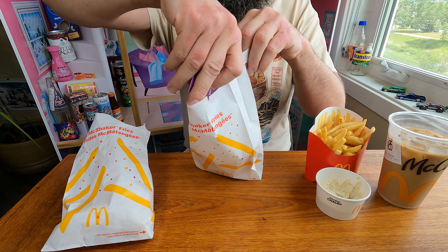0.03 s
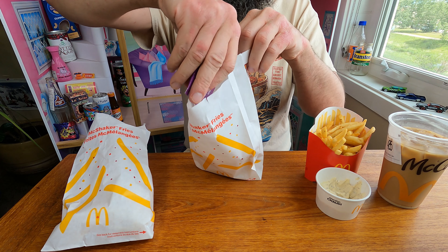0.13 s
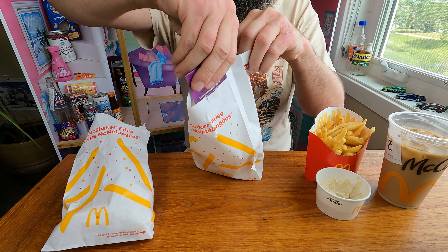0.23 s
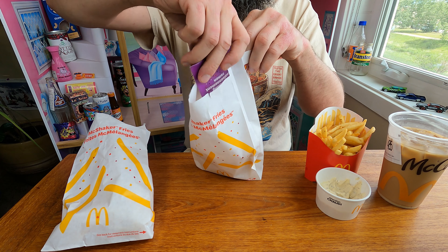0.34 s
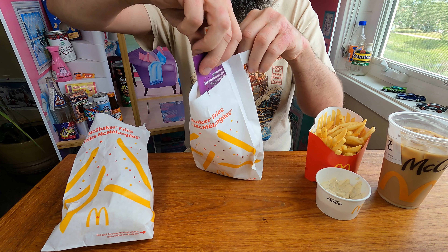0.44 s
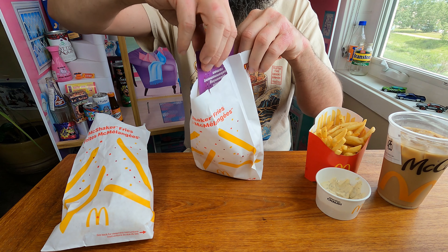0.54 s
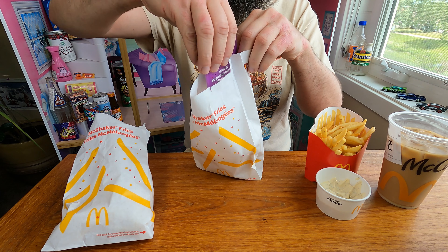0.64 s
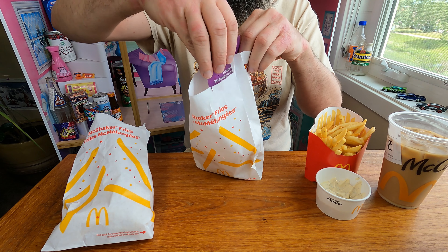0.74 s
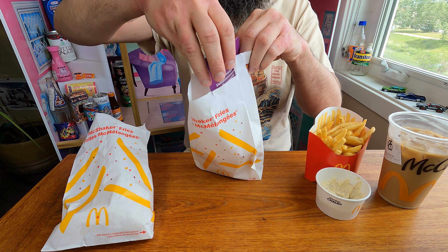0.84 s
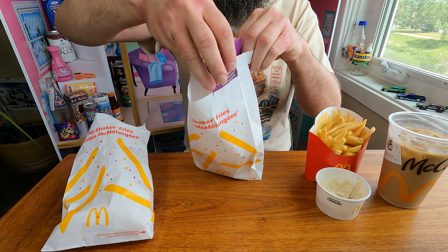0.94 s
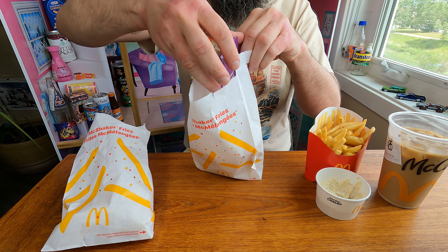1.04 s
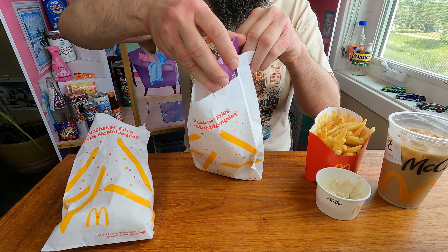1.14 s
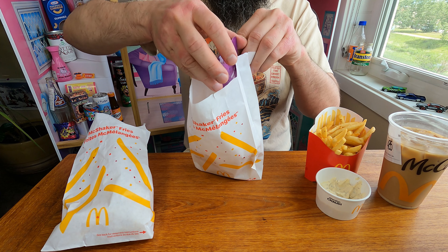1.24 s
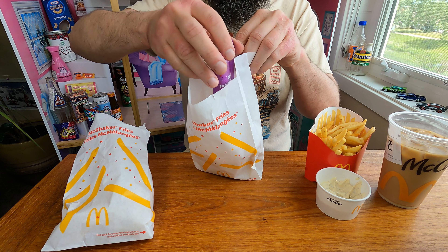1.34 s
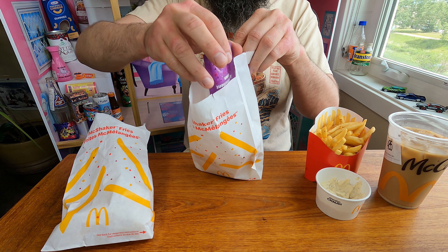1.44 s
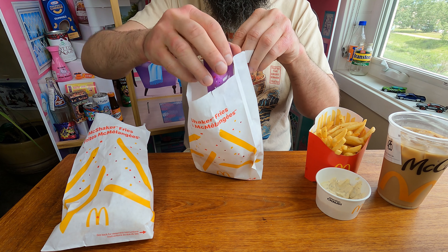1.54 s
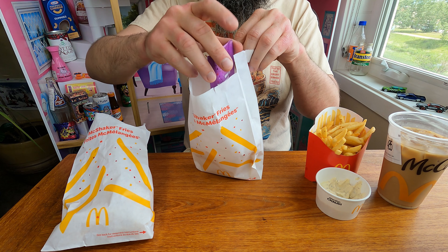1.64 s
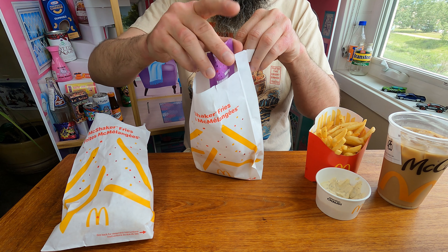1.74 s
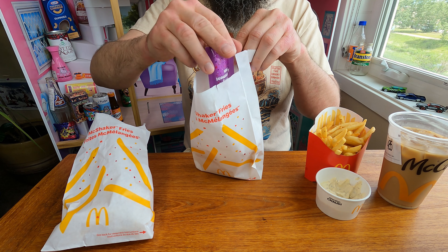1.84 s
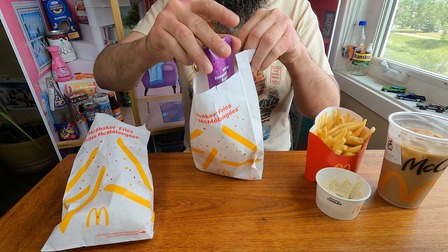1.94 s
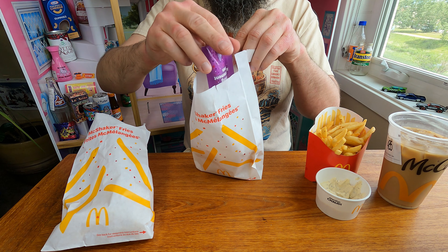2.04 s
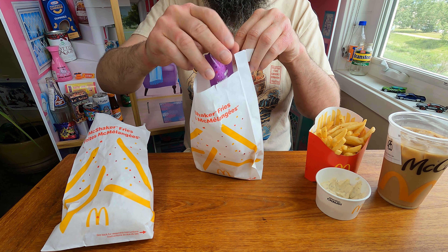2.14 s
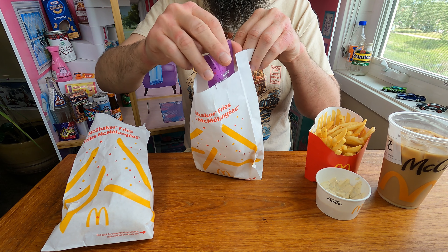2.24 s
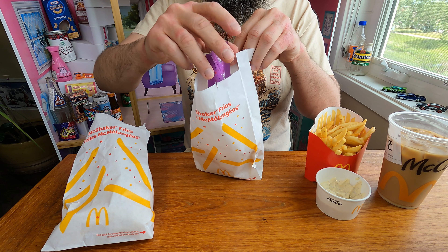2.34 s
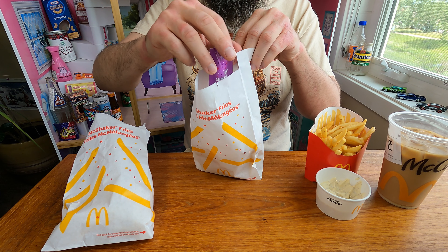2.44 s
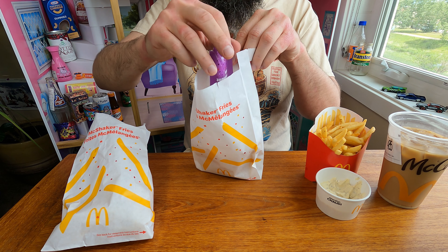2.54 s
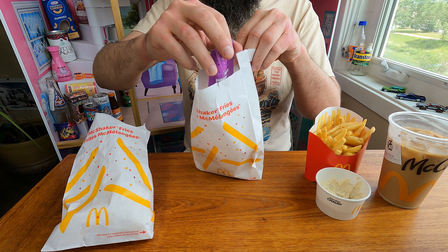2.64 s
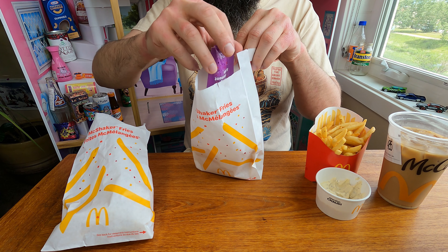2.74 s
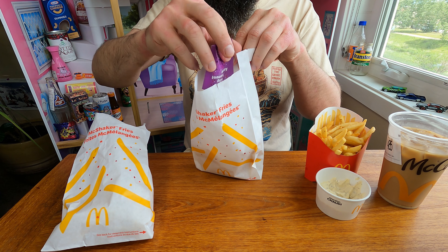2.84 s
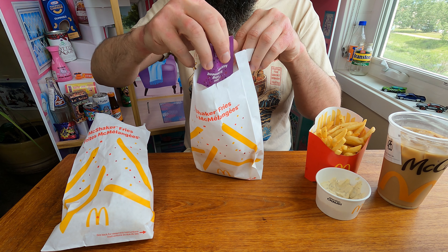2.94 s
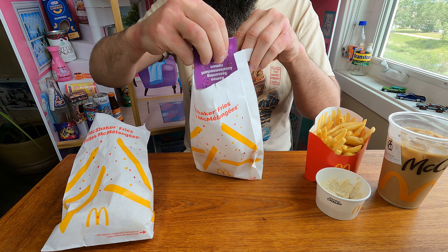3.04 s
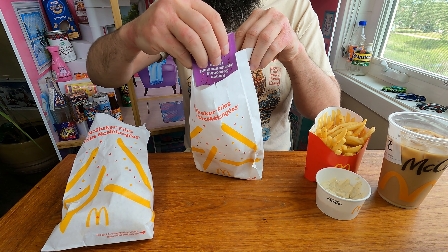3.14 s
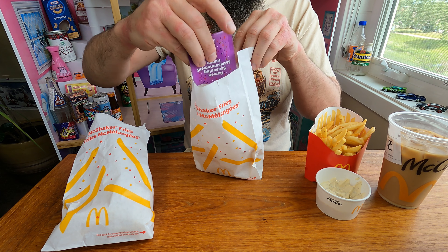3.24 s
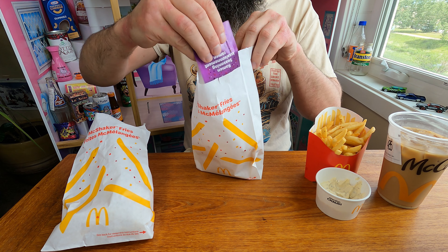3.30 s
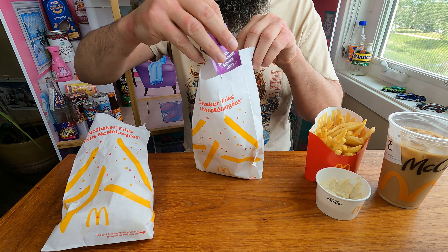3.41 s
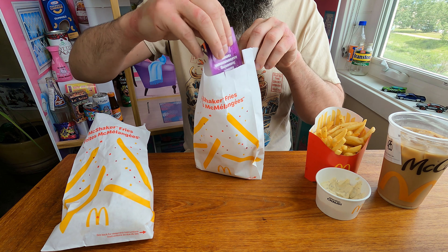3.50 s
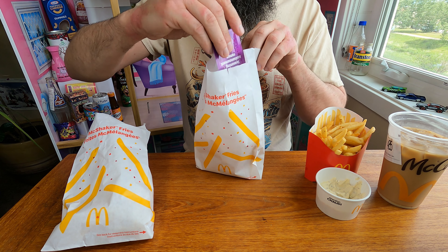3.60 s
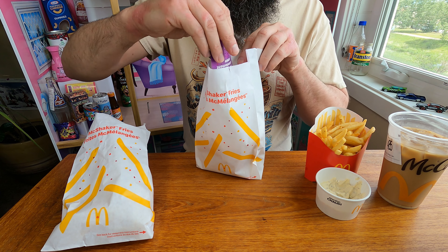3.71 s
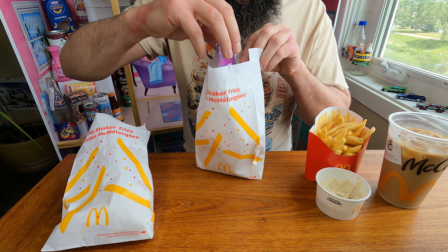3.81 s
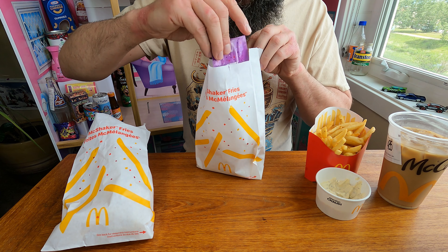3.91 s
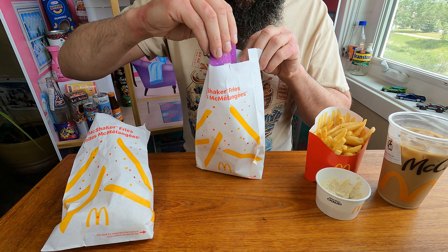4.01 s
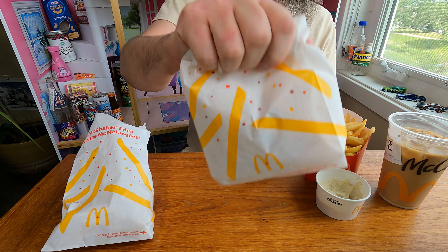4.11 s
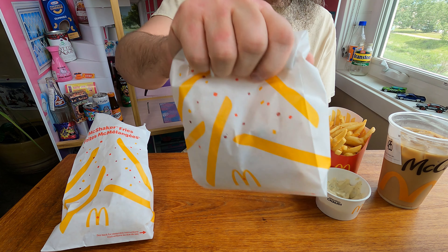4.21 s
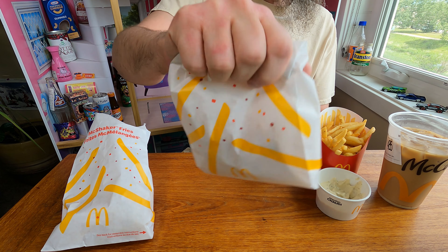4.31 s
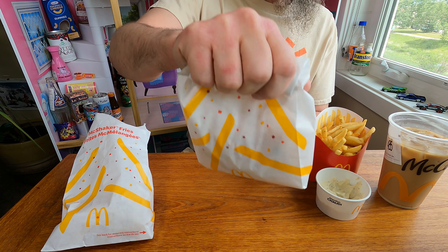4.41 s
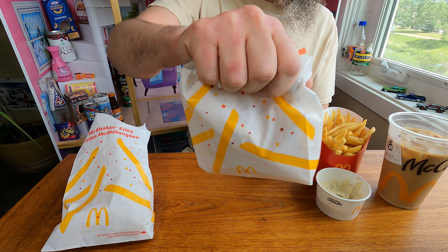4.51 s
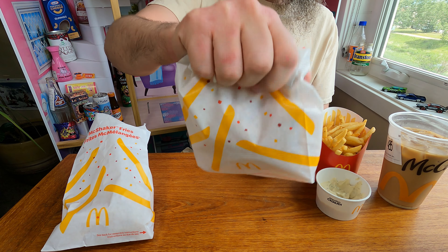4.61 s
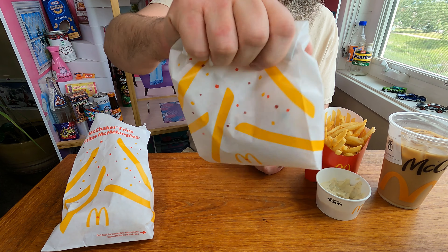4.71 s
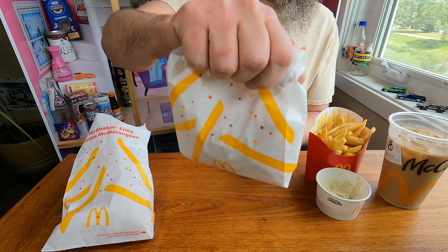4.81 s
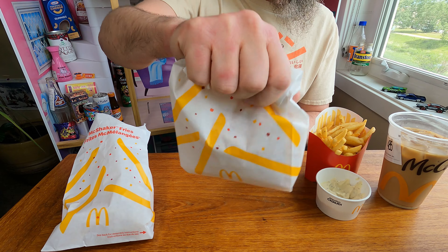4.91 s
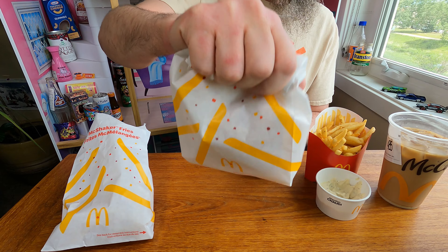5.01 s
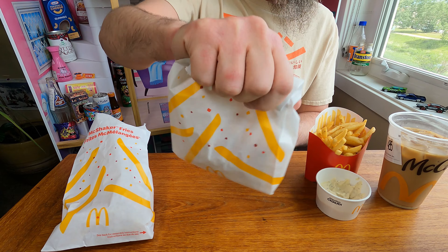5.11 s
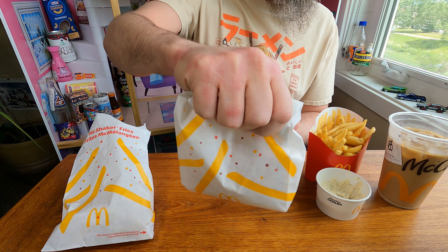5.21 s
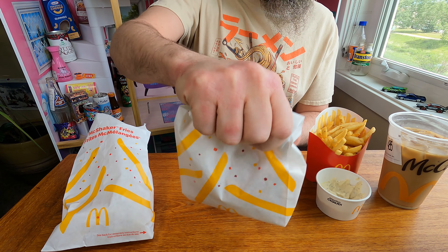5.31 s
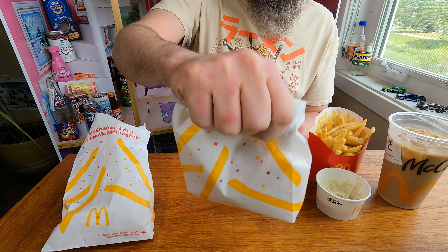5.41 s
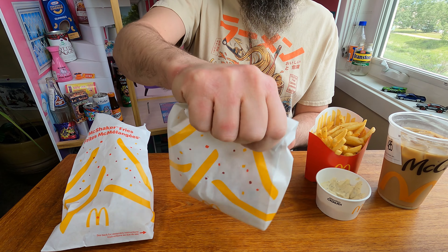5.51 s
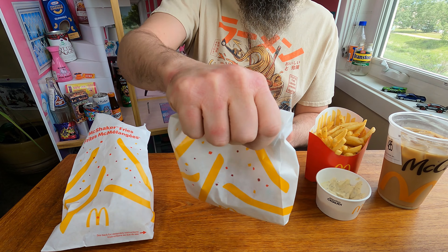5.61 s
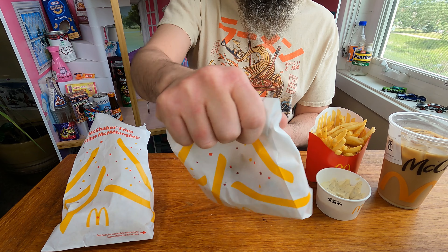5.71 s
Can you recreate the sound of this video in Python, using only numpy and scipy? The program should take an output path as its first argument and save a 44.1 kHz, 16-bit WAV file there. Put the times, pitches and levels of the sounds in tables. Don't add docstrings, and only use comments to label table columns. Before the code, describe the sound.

Very close stereo pickup at a table indoors. Sparse foil creases snap and crinkle for four seconds, with airy paper-bag booms and faint dull table bumps over a low hum. Suddenly a much louder rustle takes over: rapid uneven slaps and sharp cracks of fries against paper, easing slightly after five seconds, then a final crease and near quiet.

```python
import sys
import numpy as np
from scipy import signal
from scipy.fft import rfft, irfft
from scipy.io import wavfile
from scipy.ndimage import uniform_filter1d, map_coordinates

SR = 44100
rng = np.random.default_rng(int(sys.argv[2]) if len(sys.argv) > 2 else 0)


def pcm_store(signal):
    levels = np.round(np.clip(np.atleast_2d(signal), -1, 1) * 32767)
    wavfile.write(sys.argv[1], SR, levels.astype(np.int16).T)


def volts_from_db(level):
    exponent = np.asarray(level, float) / 20
    return 10 ** exponent


N = 253575
CUT_S = 4.0695

# (time [s], level [dB])
HUM_LEVEL = [(0, -42), (2.1, -40), (4.06, -41.5), (4.08, -50), (5.75, -53)]
# (frequency [Hz], level [dB])
ROOM_AIR = [(20, 7), (45, 6.5), (90, 4), (220, 3), (380, -7.5), (660, -44), (1400, -18), (7400, -76),
            (10000, -52), (16000, -47)]
# (time [s], peak [dB], facet [Hz], bag
# thump [dB], sparkle [dB])
FOIL_CREASES = [(0.0143, -28, 4670, -4, -22), (0.0263, -24.5, 1660, -9, -25),
                (0.0418, -18, 4350, -11.5, -15), (0.0781, -24.5, 4440, -24, -16.5),
                (0.1024, -30, 3040, -40, -10), (0.1197, -11.5, 3180, -25, -14),
                (0.1488, -15.5, 4540, -18, -15), (0.171, -21, 2150, -12, -21),
                (0.2315, -30, 3204, -19, -20), (0.2609, -23, 4580, -22, -20),
                (0.2775, -35, 4390, -24, -10), (0.2933, -19.5, 3170, -12.5, -14),
                (0.3133, -30, 2394, -14, -10), (0.3491, -17, 1790, -17, -16),
                (0.5029, -27.5, 2000, -11, -22.5), (0.5289, -30, 6900, -21, -7),
                (0.5394, -21.5, 4570, -40, -22), (0.5839, -22, 4630, -21.5, -15.5),
                (0.6268, -16.5, 2120, -18, -9), (0.6831, -25, 7360, -40, -6),
                (0.6964, -24, 4500, -40, -14), (0.5355, -24, 5500, -40, -18),
                (0.7442, -25, 1590, -10.5, -28), (0.7568, -22.5, 4350, -18, -17),
                (0.7664, -28, 3490, -31, -18), (0.8034, -29, 1830, -13, -15),
                (0.8332, -20.5, 1677, -11.5, -23), (0.9065, -20, 3100, -14, -31),
                (0.9476, -39, 5620, -10, -6), (0.9581, -26, 4710, -12, -22), (0.9649, -25, 3240, -24, -21),
                (0.9728, -21, 3140, -17, -23), (1.0248, -14.5, 3040, -30, -19),
                (1.0882, -19, 3550, -21, -10.5), (1.1151, -26, 3960, -27, -22),
                (1.2092, -35, 7260, -21, -9), (1.2182, -32, 2950, -24.5, -23),
                (1.2694, -26.5, 4070, -19, -17), (1.2771, -28.5, 4944, -28.5, -8),
                (1.2999, -25.5, 3960, -40, -9),
                (1.3213, -24, 4400, -23, -13), (1.355, -33, 4450, -13, -15.5),
                (1.372, -30, 4276, -28.5, -17.5), (1.393, -29, 3615, -40, -18),
                (1.4068, -30, 4470, -24.5, -16.5), (1.4772, -28.5, 1550, -10.5, -21),
                (1.5153, -28, 4100, -17, -22.5), (1.567, -27, 4000, -30, -18),
                (1.5691, -24, 2595, -17, -22), (1.5843, -20.5, 1630, -4.5, -20),
                (1.607, -33, 7110, -19.5, -20), (1.6177, -28, 1810, -17, -28.5),
                (1.629, -28, 1740, -40, -26), (1.652, -35, 4050, -10, -20), (1.7461, -44, 1420, -26, -11),
                (1.7672, -40, 4910, -12, -10.5), (1.83, -36.5, 1690, -16, -31),
                (1.8518, -22.5, 2780, -24, -31), (1.582, -27, 2600, -16, -20),
                (2.0152, -46, 1670, -17.5, -11), (2.0352, -33.5, 3230, -15.5, -17),
                (2.069, -41, 3100, -15, -13.5), (2.109, -45, 7620, -25, -2),
                (2.1596, -38.5, 1540, -16, -15), (2.1785, -27, 3800, -30, -23),
                (2.2297, -34, 4280, -23.5, -17), (2.3268, -35, 7100, -10, -14),
                (2.367, -43.5, 1730, -11, -6), (2.3849, -44, 4180, -20, -10), (1.709, -34, 1700, -7, -30),
                (2.4347, -29, 2250, -18, -24), (2.4442, -31.5, 2840, -24, -18),
                (2.4965, -25, 1223, -40, -31), (2.51, -23, 6500, -16, -13.5), (2.589, -33, 1400, -7.5, -18),
                (2.6121, -26, 2930, -17, -18), (2.6173, -37, 1770, -18, -24), (2.68, -35.5, 2700, -16, -16),
                (2.704, -33, 3100, -19, -14.5),
                (2.729, -40, 3220, -21, -10), (2.79, -37.5, 4240, -25, -21), (2.8042, -45, 7240, -25, -5),
                (2.8274, -31.5, 3630, -19, -19), (2.8713, -30, 2560, -17, -20),
                (2.9433, -45, 1570, -5, -24), (2.956, -36, 1550, -8, -26), (2.973, -19.5, 1720, -22, -29),
                (3.0032, -24, 3930, -9, -26), (3.0131, -23, 2030, -16, -17),
                (3.0336, -12.5, 4380, -14, -23.5), (3.113, -23, 2150, -24, -15),
                (3.12, -16.5, 2120, -21, -18), (3.1722, -29, 2150, -15, -21), (3.1946, -25, 2200, -10, -22),
                (3.2334, -24, 2916, -8.5, -23), (3.2592, -23.5, 2540, -15, -20),
                (3.2938, -29, 3150, -11, -22), (3.3303, -24.5, 6740, -19, -14.5),
                (3.3506, -32.5, 4090, -8, -23), (3.3633, -43.5, 5360, -15, -6),
                (3.3929, -47, 2800, -17, -24), (3.4018, -30.5, 4300, -28, -30),
                (3.415, -45, 7130, -31, -16.5), (3.5385, -27, 2400, -12, -25),
                (3.5484, -26, 1363, -20, -22), (3.5605, -25, 1600, -29, -25),
                (3.5681, -19, 2912, -25, -8.5), (3.576, -31, 1770, -13, -16),
                (3.2254, -25.5, 990, -12, -25), (3.6808, -37, 4550, -13, -20),
                (3.7157, -26.5, 3170, -24, -20), (3.7793, -27, 2130, -23, -26),
                (3.7947, -34.5, 1190, -5.5, -13), (3.851, -24.5, 1920, -18, -24),
                (4.017, -37, 1900, -20, -28), (3.8934, -22, 4430, -22, -25),
                (3.9102, -25.5, 2386, -36, -29), (4.0036, -36, 4610, -14, -25),
                (4.0276, -18, 4630, -23.5, -16),
                (.333, -22, 2316, -12, -22),
    (.392, -24.5, 1900, -3, -22),
    (1.067, -27, 1670, -27, -25),
    (3.0376, -13, 1860, -14, -24),
]
# (time [s], level [dB])
GRIP_LEVEL = [(0, -45), (1.1, -39.5), (1.5, -40), (1.8, -59), (1.9, -53), (1.97, -61.5), (2.1, -56),
              (2.2, -54), (2.42, -60), (2.55, -55), (2.75, -55), (2.93, -56), (3.1, -42), (3.67, -53.5),
              (3.82, -47), (4.06, -49.5)]
# (start [s], length [s], crackle [dB], bag boom under it [dB])
FINGER_MOVES = [(0, 0.2, -34.5, -7.5), (0.13, 0.037, -28, -12), (0.213, 0.21, -31.5, -6.5),
                (0.427, 0.27, -37.5, -7.5), (0.599, 0.19, -34.5, -8.5), (0.804, 0.19, -35, -4.5),
                (1.015, 0.12, -37, -17), (1.255, 0.16, -38, -23), (1.446, 0.0244, -34.5, -6),
                (1.564, 0.021, -34, -8), (1.603, 0.12, -46.5, -1.5), (1.757, 0.024, -44, -10.5),
                (1.817, 0.027, -50, -8), (2.033, 0.042, -51, -6), (2.205, 0.14, -46, -8),
                (2.442, .1, -48.5, -2), (2.582, 0.038, -46, -12), (2.68, 0.0306, -49.5, -12),
                (2.797, 0.1, -50.5, -7), (2.955, 0.068, -41, -1), (3.022, 0.02, -23.5, -15),
                (3.058, 0.07, -33, -4.5), (3.164, 0.17, -36.5, -6.5), (3.385, 0.15, -48.5, 0.5),
                (3.548, 0.043, -38, -14), (3.605, 0.044, -43, -6), (3.677, 0.1, -46.5, -9),
                (3.845, 0.097, -47, 0), (3.967, 0.069, -46, -8)]
# (frequency [Hz], level per Hz [dB])
FOIL_COLOUR = [(410, -27), (700, -13), (943, -2.5), (1800, 0), (2530, -5.5), (3150, -0.5), (5290, -6.5),
               (7500, -7.5), (8430, -14), (12000, -18), (14000, -31.5)]
# (frequency [Hz], level [dB])
CREASE_BODY = [(500, -30), (800, -15.5), (1200, 0), (3150, -0.5), (5300, -4), (7800, -7), (9300, -33.5)]
# (frequency [Hz], level [dB])
SKIN_SPARKLE = [(6000, -60), (8500, 9), (12500, -2.5), (14500, -15), (16000, -20)]
# (frequency [Hz], level [dB])
BAG_THUD = [(40, -24), (120, 0.5), (250, 0.5), (500, -2.5), (800, -16), (1500, -37.5)]
# (frequency [Hz], level [dB])
BAG_AIR = [(30, -13), (70, -6), (130, 0), (230, 0.5), (450, -2), (800, -10.5), (1200, -14), (3000, -91.5)]
# (time [s], peak [dB], frequency [Hz])
TABLE_KNOCKS = [(0.161, -34, 80.7), (1.7, -33, 115), (2.131, -28.5, 99), (3.029, -19, 82),
                (3.197, -25, 120), (5.478, -22.5, 116.7), (3.221, -30, 405), (.392, -31.5, 480),
                (.4, -29, 130), (4.068, -25, 800), (5.115, -20, 150), (1.583, -30, 420), (0.033, -29, 340)]
# (time [s], peak [dB], facet [Hz], bag thump [dB])
LOAD_SLAPS = [(4.0699, -14, 1450, -8), (4.1337, -8.5, 4430, -19), (4.1591, -8, 1318, -15.5),
              (4.188, -14, 1220, -11), (4.2288, -14, 4295, -28.5), (4.289, -4.5, 2090, -13.5),
              (4.346, -6, 2460, -16.5), (4.3982, -4, 2100, -18), (4.448, -6, 1540, -15.5),
              (4.527, -6.5, 4500, -23.5), (4.574, -3.5, 1960, -16.5), (4.649, -10, 2200, -32),
              (4.698, -5, 1520, -15.5), (4.779, -7.5, 2490, -13), (4.842, -6.5, 1970, -13.5),
              (4.8802, -13, 1280, -7), (4.9175, -13, 1270, -28), (5.0001, -6, 1143, -10.5),
              (5.07, -8, 2080, -33), (5.1471, -21, 1517, -29.5), (5.2022, -11.5, 1250, -29),
              (5.2697, -17, 1550, -4), (5.3387, -18, 2820, -26), (5.368, -12, 2860, -29),
              (5.461, -10, 2000, -27), (5.513, -16, 3850, -9), (5.559, -10, 1710, -35),
              (5.6388, -23, 1230, -10)]
# (time [s], peak [dB], facet [Hz], bag thump [dB])
LAST_CREASES = [
    (5.7044, -12.5, 1640, -22),
    (5.7193, -21, 1970, -24),
]
# (time [s], level [dB])
ARM_VIGOUR = [(4.075, -23), (4.115, -31), (4.16, -26.5), (4.29, -20.5), (5.55, -20), (5.585, -28.5),
              (5.645, -26.5), (5.672, -37.5), (5.75, -41.5)]
# (time [s], dip [dB])
LOAD_FLIGHTS = [(4.205, -1.5), (4.337, -3.5), (4.429, -4.5), (4.555, -3), (4.681, -4.5), (4.755, -6),
                (4.817, -5.5), (4.894, -3), (5.141, -5.5), (5.179, -5), (5.255, -1.5), (5.44, -0.5)]
# (time [s], peak [dB], facet [Hz])
FRY_CRACKS = [(4.1021, -16, 2760), (4.1203, -14, 2280), (4.1331, -10, 4340), (4.143, -18, 4570),
              (4.163, -12, 2930), (4.1898, -8.5, 4580), (4.2217, -21, 2670), (4.23, -5, 4340),
              (4.2391, -14, 3400), (4.3208, -7, 2400), (4.3472, -17.5, 4820), (4.4476, -8, 3490),
              (4.4781, -20, 2580), (4.491, -18.5, 3850), (4.5307, -12, 4570), (4.541, -18, 7100),
              (4.591, -8, 3360), (4.6311, -19, 2150), (4.6437, -14, 3270), (4.65, -11, 2900),
              (4.6673, -12, 4740), (4.6787, -16, 7320), (4.7073, -12, 3440), (4.7293, -14, 3190),
              (4.739, -12, 2420), (4.7772, -10, 2830), (4.8084, -18.0, 4610), (4.825, -16, 2150),
              (4.8521, -7, 2110), (4.882, -10, 2500), (4.9034, -18, 4650), (4.9203, -7, 4500),
              (4.9444, -15, 4850), (4.9655, -8, 4740), (4.978, -12, 5210), (4.9976, -13, 7500),
              (5.0386, -13, 2540), (5.091, -15, 2440), (5.1294, -11, 2530), (5.1488, -8, 6720),
              (5.2305, -8, 4180), (5.2544, -21, 2500), (5.284, -18, 5900), (5.2947, -6.5, 3120),
              (5.347, -18, 2890), (5.3906, -22, 2720), (5.4033, -22, 1980), (5.4186, -9.5, 3180),
              (5.4633, -19, 5300), (5.5169, -10, 2980), (5.5385, -12, 1610), (5.561, -11, 1580),
              (5.6033, -13, 5530), (5.61, -16, 3270), (5.636, -16.5, 3840), (5.647, -19, 2240),
              (5.6555, -22, 4570)]
# (frequency [Hz], level per Hz [dB])
PAPER_COLOUR = [(410, -13), (700, -2.5), (807, -5), (1500, 1.5), (1760, -2.5), (2050, -1), (4500, -4.5),
                (7220, -8), (8320, -13), (12400, -20), (14000, -34.5)]
# (frequency [Hz], decay by 60 dB [s])
WALL_DECAY = [(200, 0.14), (2000, 0.043), (10000, 0.0095)]
# (frequency [Hz], lead [rad])
PORT_LEAD = [(100, 0.054), (1000, -0.17), (3600, -0.63), (5000, 0.21), (9000, 0.063), (11000, 0.078)]
# (frequency [Hz], level [dB])
PORT_DIFFERENCE = [(100, -31), (1000, -16), (4000, -10), (8000, -7.5), (12000, -4.5), (16000, 5.5)]
# (frequency [Hz], gain [dB])
MIC_RESPONSE = [(20, -2), (13300, -0.5), (14600, -8), (15200, -15), (16400, -15)]


def unit(x):
    return x / np.sqrt(np.mean(x ** 2) + 1e-20)


def along(points, hz):
    f, v = np.transpose(points)
    return np.interp(np.log(hz + 1), np.log(f + 1), v)


def curve(points):
    s, value = np.transpose(points)
    return np.interp(np.arange(N) / SR, s, value)


def wobble(rate):
    knots = rng.standard_normal(int(N * rate / SR) + 4)
    return map_coordinates(knots, [np.arange(N) * rate / SR])


def coloured(x, points):
    gain = volts_from_db(along(points, np.fft.rfftfreq(4096, 1 / SR)))
    cepstrum = irfft(np.log(gain + 1e-6))
    cepstrum[1:2048] *= 2
    cepstrum[2049:] = 0
    h = irfft(np.exp(rfft(cepstrum)))[:2048]
    return signal.fftconvolve(x, (h / np.linalg.norm(h))[None], axes=1)[:, :N]


def scatter(times, shapes, pan_db):
    start = np.round(times * SR).astype(int)[:, None]
    at = (start + np.arange(shapes.shape[1])).ravel()
    sides = []
    for side in (.5, -.5):
        weighted = shapes * volts_from_db(side * pan_db)[:, None]
        sides.append(np.bincount(at, weighted.ravel(), N + SR)[:N])
    return np.array(sides)


def background():
    hz = 58.5 + .5 * wobble(3.47)
    level_db = curve(HUM_LEVEL) + 4.5 + 0.28 * wobble(7.4)
    hum = volts_from_db(level_db) * np.sin(2 * np.pi * np.cumsum(hz) / SR)
    noise = rng.standard_normal(N) + 0.3 * rng.standard_normal((2, N))
    air = unit(coloured(noise, ROOM_AIR))
    return hum * volts_from_db([[.3], [-.3]]) + volts_from_db(-50.0) * air


def facet(hz, ring_db):
    return volts_from_db(ring_db) * np.sin(2 * np.pi * hz[:, None] * np.arange(1600) / SR)


def flicks(s, db, colour, rise, t60, tail_db, ring=0, span=30, spike=0):
    t = np.arange(1600) / SR
    z = rng.standard_normal((len(s), len(t)))
    fade = (volts_from_db(-60 * t / t60) + volts_from_db(tail_db - 60 * t / 0.058)) * (1 - np.exp(-t / rise))
    energy = np.linalg.norm(fade)
    kick = spike * energy * z[:, :1] * (np.arange(len(t)) == 20)
    burst = coloured(fade * z + kick, colour)[:, :len(t)]
    burst = burst / np.linalg.norm(burst, axis=1, keepdims=True) * energy
    shape = burst + volts_from_db(-60 * t / t60) * ring
    peak = np.sqrt(2 * uniform_filter1d(shape ** 2, size=span, axis=1).max(axis=1))
    return scatter(s, (volts_from_db(db) / peak)[:, None] * shape, 1.0 * z[:, -1])


def crackle(count, spread_db, cycles, clump_db, pan_db, tick_db):
    u, t = rng.random((count, 5)), np.arange(128) / SR
    hz = 700 * 12 ** u[:, 1:2]
    size = volts_from_db(-spread_db * np.log(u[:, 2:3] + 0.029))
    age = hz * t / cycles
    tone = np.sin(2 * np.pi * (hz * t + u[:, 3:4]))
    wavelet = hz / 3000 * tone * age * np.exp(-age)
    tick = volts_from_db(tick_db - 60 * t / 0.0035) * rng.standard_normal((count, len(t)))
    clumps = volts_from_db(clump_db * (0.44 * wobble(60) + wobble(220)))
    grains = scatter(u[:, 0] * N / SR, size * (wavelet + tick), pan_db * (2 * u[:, 4] - 1))
    return unit(grains * clumps)


def moving(column_db):
    start, length = np.transpose(FINGER_MOVES)[:2]
    attack_s, release_s = 0.0061, 0.0087
    coarse = np.arange(0, N, 32)
    t = coarse[:, None] / SR - start
    attack = 1 - np.exp(-np.clip(t, 0, None) / attack_s)
    release = np.exp(-np.clip(t - length, 0, None) / release_s)
    return np.interp(np.arange(N), coarse, (attack * release) @ volts_from_db(2 * column_db))


def stirred(steady_db, s, db, lead_s, settle_s):
    t = np.arange(-SR // 4, SR // 4) / SR
    swell = np.exp(np.where(t < 0, t / lead_s, -t / settle_s))
    pushes = np.bincount(np.round(s * SR).astype(int), volts_from_db(2 * db), N)[:N]
    return np.sqrt(volts_from_db(2 * steady_db) + np.abs(signal.fftconvolve(pushes, swell, "same")))


def patchy(x):
    z = signal.stft(x, nperseg=256)[2]
    field = rng.standard_normal(z.shape[1:])
    field = uniform_filter1d(uniform_filter1d(field, size=4, axis=0), size=14, axis=1)
    return signal.istft(z * volts_from_db(1.2 * unit(field)), nperseg=256)[1][:, :N]


def rustle(effort, events, sheet, grains, smooth_db, gain_db, stir_db, boom_db, lead_s, settle_s,
           moves=(0, 0)):
    steady_db = curve(effort)
    s, db, _, low_db = np.transpose(events)
    hiss = rng.standard_normal(N) + 0.28 * rng.standard_normal((2, N))
    lumps = volts_from_db(2 * wobble(25))
    boom = lumps * (rng.standard_normal(N) + 0.2 * rng.standard_normal((2, N)))
    top = unit(coloured(patchy(grains + volts_from_db(smooth_db) * hiss), sheet))
    low = unit(coloured(boom, BAG_AIR))
    sheet_stir = stirred(steady_db + gain_db, s, db + stir_db, lead_s, settle_s)
    bag_stir = stirred(steady_db - 11.5, s, db + low_db + boom_db, lead_s, settle_s)
    return np.sqrt(sheet_stir ** 2 + moves[0]) * top + np.sqrt(bag_stir ** 2 + moves[1]) * low


def handling():
    creases = np.array(FOIL_CREASES)
    s, db, hz, low_db, high_db = creases.T
    pops = flicks(s, db + 1.5, CREASE_BODY, rise=.0002, t60=.009, tail_db=-19,
                  ring=facet(hz, ring_db=2), spike=.6)
    sparkle = flicks(s, db + high_db + 0.87, SKIN_SPARKLE, rise=0.00025, t60=0.0094, tail_db=-23.5, spike=.4)
    thump = flicks(s, db + low_db - .8, BAG_THUD, rise=.002, t60=.06, tail_db=-30, span=300)
    crackle_db, boom_db = np.transpose(FINGER_MOVES)[2:]
    moves = moving(crackle_db - 1.1), moving(crackle_db + boom_db - 3.0)
    grains = crackle(count=11000, spread_db=3.0, cycles=1.5, clump_db=3.0, pan_db=6.5, tick_db=-3.0)
    foil = rustle(GRIP_LEVEL, creases[:, :4], FOIL_COLOUR, grains, smooth_db=-5, gain_db=-1.5,
                  stir_db=-20, boom_db=-8.0, lead_s=0.0019, settle_s=0.0063, moves=moves)
    return pops + sparkle + thump + foil


def knocks():
    s, db, hz = np.transpose(TABLE_KNOCKS)[:, :, None]
    age = np.arange(3000) / SR / 0.0076
    push = age * np.exp(-age) * np.sin(2 * np.pi * hz * age * 0.00796)
    return scatter(s[:, 0], volts_from_db(db + 3.5) * push, 0 * s[:, 0])


def snaps(events, sheet, rise, t60, ring_db, gain_db, thump_db):
    s, db, wide_hz, low_db = np.transpose(events)[:, :, None]
    t = np.arange(1600) / SR
    z = rng.standard_normal((len(s), 4, len(t)))
    s, pan_db = s[:, 0], 1.0 * z[:, 2, 0]
    narrow_hz = 3100 * np.exp(0.47 * z[:, 3, -1:])
    high_db = -19.5 + 1.5 * z[:, 3, -2:-1]
    onset = 1 - np.exp(-t / rise)
    ragged = volts_from_db(3.3 * np.repeat(z[:, 3, :40], 40, axis=1))
    fade = (volts_from_db(-60 * t / t60) + volts_from_db(-21 - 60 * t / .06)) * onset * ragged
    fade = fade * np.sqrt(t60 * SR / 20) / np.linalg.norm(fade * z[:, 0], axis=1, keepdims=True)
    dull = [p for p in sheet if p[0] < 8000] + [(9500, -34)]
    facets = np.sin(2 * np.pi * wide_hz * t) + 0.22 * np.sin(2 * np.pi * narrow_hz * t)
    ring = volts_from_db(ring_db - 60 * t / (2.1 * t60)) * facets * onset
    pop = coloured(scatter(s, volts_from_db(db - 8) * fade * z[:, 0], pan_db), dull)
    body = pop + scatter(s, volts_from_db(db) * ring, pan_db)
    top = scatter(s, volts_from_db(db + high_db - 0.5) * fade * z[:, 1], pan_db)
    thump = volts_from_db(db + low_db + thump_db - 60 * t / 0.069) * (1 - np.exp(-t / 0.0022))
    low = scatter(s, thump * z[:, 2], 0 * pan_db)
    return volts_from_db(gain_db) * (body + coloured(top, SKIN_SPARKLE) + coloured(low, BAG_AIR))


def shaking():
    grains = crackle(count=26000, spread_db=1.5, cycles=1.59, clump_db=1.6, pan_db=2.0, tick_db=-2.0)
    blows = snaps(LOAD_SLAPS, PAPER_COLOUR, rise=0.004, t60=0.04, ring_db=-15, gain_db=-3.5, thump_db=1)
    wash = rustle(ARM_VIGOUR, LOAD_SLAPS, PAPER_COLOUR, grains, smooth_db=-13, gain_db=-.8,
                  stir_db=-15.5, boom_db=-11, lead_s=.008, settle_s=.018)
    last = snaps(LAST_CREASES, PAPER_COLOUR, rise=0.00035, t60=0.022, ring_db=-11.0, gain_db=2.0, thump_db=2.0)
    t, flight_s = np.arange(N) / SR, 0.0093
    dip_db = sum(db * np.exp(-((t - s) / flight_s) ** 2) for s, db in LOAD_FLIGHTS)
    return (blows + last + wash) * volts_from_db(dip_db)


def fry_strikes():
    s, db, hz = np.transpose(FRY_CRACKS)
    return flicks(s, db - 2.5, PAPER_COLOUR, rise=.0002, t60=.007, tail_db=-22,
                  ring=facet(hz, ring_db=-3), spike=.4)


def room(x):
    hz, t, z = signal.stft(rng.standard_normal((3, SR // 3)), SR, nperseg=256)
    z = z[0] + np.clip(hz / 2500, .1, 1.5)[:, None] * z[1:]
    decay = volts_from_db(-60 * t / along(WALL_DECAY, hz)[:, None])
    tail = signal.istft(z * decay, SR, nperseg=256)[1]
    tail = tail / np.linalg.norm(tail[0])
    late = np.pad(x.mean(0), (200, 0))[None]
    return x + volts_from_db(-16.0) * signal.fftconvolve(late, tail, axes=1)[:, :N]


def scene():
    later = np.arange(N) >= CUT_S * SR
    packet = room(handling())
    bag = room((shaking() + fry_strikes()) * later * volts_from_db([[-.4], [.4]]))
    return np.where(later, bag, packet) + knocks() + background()


def roll_off(x):
    return signal.sosfilt(signal.butter(12, 16480, fs=SR, output="sos"), x)


def record(dry):
    z = signal.stft(dry.mean(0), nperseg=128)[2]
    chance_phase = np.exp(2j * np.pi * rng.random(z.shape[1]))
    scattered = signal.istft(z * chance_phase, nperseg=128)[1][:N]
    hz = np.fft.rfftfreq(N, 1 / SR)
    sign = np.array([[1], [-1]])
    ports = rfft(dry) * np.exp(.5j * sign * along(PORT_LEAD, hz))
    ports = ports + sign * rfft(scattered) * volts_from_db(along(PORT_DIFFERENCE, hz))
    x = irfft(ports, N)
    x = x / (1 + np.abs(x / .7) ** 4) ** .25
    mix = irfft(rfft(x) * volts_from_db(along(MIC_RESPONSE, hz)), N)
    return roll_off(mix)


dry = scene()
out = record(dry)
pcm_store(out)
```